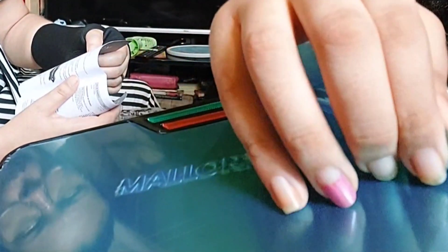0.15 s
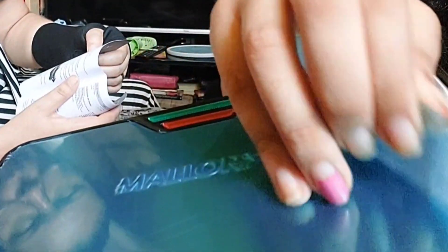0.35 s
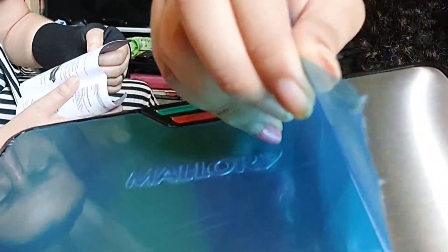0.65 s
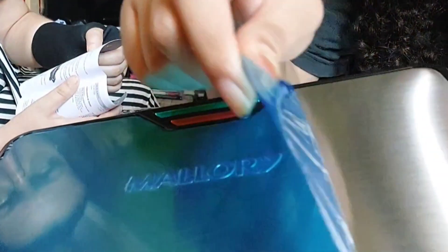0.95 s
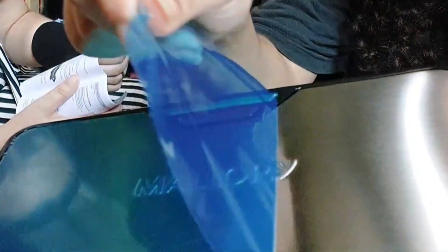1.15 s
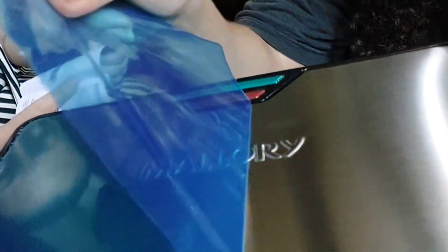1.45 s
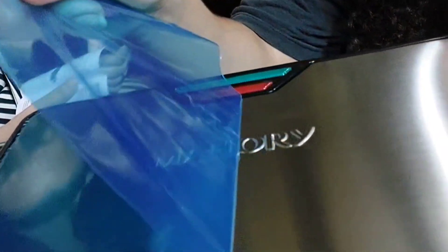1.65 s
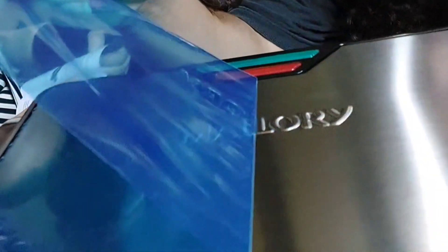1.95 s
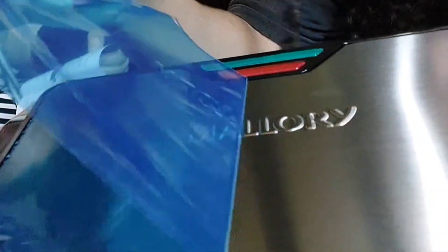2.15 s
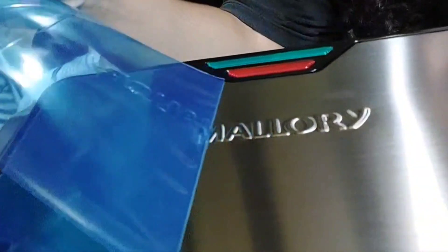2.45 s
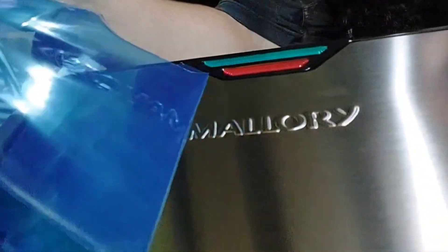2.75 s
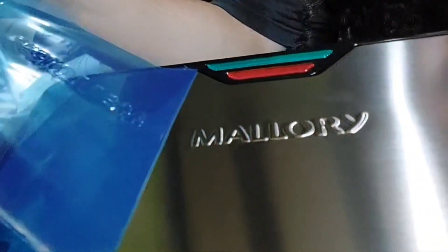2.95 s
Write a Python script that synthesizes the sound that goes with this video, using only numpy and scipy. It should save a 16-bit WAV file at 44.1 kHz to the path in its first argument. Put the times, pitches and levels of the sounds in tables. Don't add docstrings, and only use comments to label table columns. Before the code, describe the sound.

Protective film is peeled off a sheet-metal lid very close to a stereo microphone: single sticky snaps, two quick yanks, a pause, a long falling rip, slower pulls and crackles, in a small quiet room.

```python
import sys
import numpy as np
from scipy import signal
from scipy.fft import rfft, irfft, next_fast_len
from scipy.io import wavfile
from scipy.ndimage import map_coordinates

SR = 44100
rng = np.random.default_rng(int(sys.argv[2]) if len(sys.argv) > 2 else 0)


def boost_factor(decibels):
    exponent = np.asarray(decibels, float) / 20
    return 10 ** exponent


def transcribe(u):
    v = np.clip(np.atleast_2d(u).T, -1, 1)
    q = np.round(v * 32767).astype(np.int16)
    wavfile.write(sys.argv[1], SR, q)


N = 136710

# time in seconds, pull strength in dB, slip rate in Hz,
# push on the lid in dB.
FAST_PULLS = [
    [(.232, -31, 401.7, -23), (.25, -28.5, 500.3, -43), (.285, -46.5, 200.3, -17)],
    [(.339, -26.5, 396.6, -5), (.352, -23.5, 698.3, -13), (.43, -29, 1039, -4.5), (.465, -29, 568.7, -3.5),
     (.49, -34, 470.7, 6), (.512, -53.5, 421.5, 0)],
    [(.926, -30.5, 1543, -9.5), (1.0, -29.5, 1461, -4.5), (1.08, -29, 1073, -1.5), (1.16, -30, 669.1, -3),
     (1.31, -31, 432.9, -3.5), (1.37, -30, 291, -5), (1.403, -43, 212, 4)],
    [(1.512, -32.5, 289.8, -5.5), (1.58, -30, 331.8, -9), (1.7, -31.5, 499.3, -6.5),
     (1.77, -32.5, 302.5, -7), (1.852, -39, 158.5, 2)],
    [(2.069, -35.5, 402.5, -3.5), (2.12, -31, 652.4, -9.5), (2.3, -32, 486.2, -6.5),
     (2.4, -33.5, 347.5, -6.5), (2.463, -36.5, 250.7, -3.5)],
    [(2.699, -32, 280.7, -5), (2.76, -32.5, 398.3, -7.5), (2.8, -31, 642.4, -4.5), (2.91, -34.5, 644, -1),
     (2.95, -34.5, 545.7, -3), (3.01, -40.5, 420, 4)],
]
# time in seconds, strength in dB.
LONE_SLIPS = [(0.0927, -13.0), (0.1062, -10.0), (0.1193, -9.0), (0.1311, -11.0), (0.1441, -6.0),
              (0.1567, -7.0), (0.1675, -6.0), (0.1804, -12.0), (0.1921, -5.0), (0.2086, -8.0),
              (0.2207, -8.0), (0.2289, -9.0), (0.2341, 0.0), (0.2379, -3.0), (0.2421, -8.0),
              (0.2486, -7.0), (0.2546, -2.0), (0.2649, -4.0), (0.2785, -6.0), (0.323, -5.0),
              (0.3295, -7.0), (0.336, -5.0), (0.3443, -2.0),
              (1.3953, -13.0), (1.4075, -15.0), (1.4277, -12.0), (1.4345, -18.0), (1.4421, -14.0),
               (1.4476, -18.0), (1.4563, -11.0), (1.4665, -16.0), (1.476, -13.0), (1.4834, -12.0),
               (1.4907, -14.0), (1.4949, -15.0), (1.5007, -13.0), (1.5043, -13.0), (1.5084, -12.0),
               (2.0504, -18.0), (2.054, -20.0),
              (2.5042, -14.0), (2.5163, -35.0), (2.5214, -13.0), (2.5323, -28.0), (2.5462, -13.0),
               (2.5615, -12.0), (2.5639, -13.0), (2.5737, -13.0), (2.5893, -15.0), (2.5922, -13.0),
               (2.5947, -15.0), (2.6015, -16.0), (2.6155, -9.0), (2.6238, -11.0), (2.6288, -15.0),
               (2.65, -13.0), (2.653, -18.0), (2.6678, -11.0), (2.6731, -15.0), (2.6824, -25.0),
               (2.6879, -8.0), (2.6939, -12.0), (2.6966, -11.0),
              (.1715, -10), (.1965, -15), (.2068, -11), (.2188, -14), (.3505, -2), (2.5195, -16),
               (2.525, -19), (2.6215, -15), (2.6483, -17), (2.6655, -18)]
# time in seconds, strength in dB.
SETTLING_TICKS = [(0.0415, -39), (0.538, -31.5), (.569, -53), (0.589, -42.5), (0.728, -52), (0.7647, -43.5)]
# time in seconds, strength in dB.
STUBBORN_SPOTS = [(0.3606, -3.0), (0.3711, -1.0), (0.3938, -6.0), (0.4018, -6.0), (0.4187, -6.0),
                  (0.4233, -5.0), (0.4364, -7.0), (0.4456, -5.0), (0.4611, -10.0), (1.797, -11.0),
                  (1.8015, -14.0), (1.806, -15.0), (1.8144, -6.0), (1.8214, -10.0), (1.8318, -16.0),
                  (1.8404, -12.0), (1.8465, -13.0), (2.3359, -11.0), (2.3498, -12.0), (2.3719, -9.0),
                  (2.3764, -6.0), (2.3855, -11.0), (2.3888, -11.0), (2.3932, -8.0), (2.3964, -9.0),
                  (2.4088, -9.0), (2.4158, -11.0), (2.4263, -8.0), (2.43, -9.0), (2.4339, -11.0),
                  (2.4381, -9.0), (2.4454, -8.0), (2.4536, -11.0)]
# time in seconds, level in dB.
SLACK_TUG = [(.3, -1), (1.45, 4), (2.05, -1.5), (2.5, 4.5)]

# frequency in Hz, level in dB per Hz.
CORNER_COLOUR = [(530, -37.5), (900, -15), (1640, -11.5), (2960, -5.5), (6030, -8.5), (8870, -18.5),
                 (14000, -13), (16000, -24)]
FREE_CORNER_COLOUR = [(530, -15.5), (900, -6.5), (1300, -3.5), (2300, -1.5), (4000, -7), (7000, -10.5),
                      (8870, -18.5), (16000, -12)]
PULL_START_COLOUR = [(530, -26), (900, -13.5), (1500, -6), (2300, -11.5), (3200, -6), (5400, -5.5),
                     (7200, -13), (8660, -16.5), (16000, -17.5)]
MIDDLE_COLOUR = [(530, -37), (900, -2), (1570, -4), (2300, -7), (3300, 0.5), (6720, -3.5), (8660, -15.5),
                 (12000, -8.5), (16000, -19.5)]
LATE_COLOUR = [(530, -20), (900, -10.5), (1570, -6), (2300, -14), (4000, -7.5), (7000, -5), (8660, -18.5),
               (16000, -17)]
FAR_COLOUR = [(530, -32.5), (900, -9.5), (1080, -6.5), (1170, -9), (2830, -1.5), (5410, -9), (6800, -4.5),
              (16000, -21.5)]
END_COLOUR = [(530, -37.5), (900, -15), (1050, -12.5), (1770, -7.5), (3910, -2), (7230, -8), (8550, -14.5),
              (16000, -14)]
COLOUR_TIMES = [.36, .47, 1.0, 1.35, 1.7, 2.4, 2.8]
# time in seconds, left lag in samples, left minus right in dB.
PEEL_PATH = [(0.203, -13, 0), (1.0, -6, -3), (1.702, -4, 1.5), (2.998, -1, 2.5)]
# frequency in Hz, level in dB.
TUG_COLOUR = [(120, -27), (250, -5), (500, -1.5), (1100, -6), (1700, -4), (3000, -19), (8000, -54.5)]
# start in seconds, low ring in Hz, its level in dB,
# high ring in Hz, its level in dB.
FILM_RINGS = [(0, 2660, -3, 6500, -3), (.6, 1400, 0, 6400, 5.5), (2.2, 2500, -0.5, 6900, -27)]
# frequency in Hz, width in Hz, level in dB.
LID_RINGS = [(549, 61, -6), (639, 20, 4.5), (1073, 36, 2), (1651, 26, -39.5), (2400, 110, -22),
             (2886, 90, 1.5), (4070, 88, 3), (5190, 1000, -0.5), (7110, 660, 6.5)]

# frequency in Hz, time to fall by 60 dB in seconds.
ROOM_DECAY = [(300, .13), (2000, .13), (6000, .11), (12000, .1)]
# frequency in Hz, level in dB.
WALL_COLOUR = [(300, 1.5), (2500, 0), (7000, -3), (14000, -12)]
# frequency in Hz, level in dB per Hz.
AIR_COLOUR = [(71, -35.5), (120, -2), (217, -7), (402, -15), (569, -14.5), (2380, -30), (9020, -40),
              (14200, -34), (16000, -36)]
RUMBLE_COLOUR = [(13, -52.5), (30, -26.5), (50, 4.5), (70, 9.5), (110, 4), (160, -32.5), (210, -36.5),
                 (350, -120)]
# time in seconds, level in dB.
AIR_GAIN_CURVE = [(.03, 4), (.6, -3.5), (.9, -5), (2.0, -1), (3.1, 3)]
# time in seconds, level in dB.
HAND_CURVE = [(0.0, -54.5), (.22, -48), (.33, -57.5), (.36, -42), (.385, -52), (0.42, -45), (0.53, -64),
              (0.59, -59), (1.34, -50.5), (1.6, -52), (1.8, -52.5), (2.34, -55.5), (2.42, -46.5),
              (2.57, -52.5), (2.96, -46), (3.1, -61)]
# frequency in Hz, left minus right in dB.
PORT_DIFFERENCE = [(600, .5), (3000, -2), (9000, 2)]

SNAP_DB, TEAR_DB, STUBBORN_DB = 0.5, 2, -1.5
PUSH_DB, SNAP_PUSH_DB = -7, -15.5
SLIP_SPREAD_DB, CRACK_SPREAD_DB, PUSH_SPREAD_DB = 2, 3, 1.5
JITTER, WANDER = .13, .11
BURST_S, SNAP_S, SNAP_SHIFT_S = .0014, .0009, -.0005
LAG_SPREAD, PAN_SPREAD_DB = 1.0, 2.5
LOW_RING_WIDTH_HZ, HIGH_RING_WIDTH_HZ = 800, 1500
LID_CRACK_DB, LID_TUG_DB = -10.5, 3.5
ROOM_DB, AIR_DB = -5, -61.5
EARLY_T60_S, EARLY_DB = .035, 6
TOP_HZ = 15950


def unit(x):
    return x / np.sqrt(np.mean(x ** 2) + 1e-20)


def along(points, hz):
    f, v = np.transpose(points)
    return np.interp(np.log(hz + 1), np.log(f + 1), v)


def over_time(points, t):
    return np.interp(t, *np.transpose(points))


def wobble(rate):
    return map_coordinates(rng.standard_normal(400), [np.arange(N) * rate / SR % 399])


def filtered(x, response):
    m = 2 * next_fast_len(N // 2 + 8192)
    return irfft(rfft(x, m) * response(np.fft.rfftfreq(m, 1 / SR)), m)[..., :N]


def causal(points, hz):
    c = irfft(np.log(boost_factor(along(points, hz)) + 1e-4))
    half = len(c) // 2
    c[1:half] *= 2
    c[half + 1:] = 0
    h = np.exp(rfft(c))
    return unit(np.abs(h)) * np.exp(1j * np.angle(h))


def resonance(f, centre, width, db):
    return boost_factor(db) * 1j * f * width / (centre * centre - f * f + 1j * f * width)


def impulses(s, size):
    at = np.clip(s * SR, 8, N - 10)
    k = np.floor(at)[:, None] + np.arange(-7, 9)
    d = k - at[:, None]
    click = size[:, None] * np.sinc(d) * np.cos(np.pi * d / 16) ** 2
    return np.bincount(k.astype(int).ravel(), click.ravel(), N)


def pulling(t):
    return sum((t >= p[0][0]) & (t <= p[-1][0]) for p in FAST_PULLS)


def slips():
    t, rows = np.arange(N) / SR, np.concatenate(FAST_PULLS)
    rate_hz = np.exp(np.interp(t, rows[:, 0], np.log(rows[:, 2])) + WANDER * wobble(90))
    at = np.flatnonzero(np.diff(np.floor(np.cumsum(pulling(t) * rate_hz / SR))))
    z = rng.standard_normal((3000, 3))[:len(at)].T
    fast_s = t[at] + JITTER * z[0] / rate_hz[at]
    pull_db = np.interp(fast_s, rows[:, 0], rows[:, 1]) + TEAR_DB
    mean = boost_factor(pull_db) * np.sqrt(SR / rate_hz[at])
    fast_size = mean * boost_factor(SLIP_SPREAD_DB * z[1])
    push_db = np.interp(fast_s, rows[:, 0], rows[:, 3]) + PUSH_DB
    fast_push = mean * boost_factor(push_db + PUSH_SPREAD_DB * z[2])

    stubborn = np.array(STUBBORN_SPOTS) + [0, STUBBORN_DB]
    lone_s, lone_db = np.concatenate([LONE_SLIPS,
                                      SETTLING_TICKS, stubborn]).T
    lone_size = boost_factor(lone_db + SNAP_DB)
    lone_push = lone_size * boost_factor(SNAP_PUSH_DB + over_time(SLACK_TUG, lone_s))

    s = np.r_[lone_s + SNAP_SHIFT_S, fast_s]
    burst_s = np.r_[0 * lone_s + SNAP_S, 0 * fast_s + BURST_S]
    return s, np.r_[lone_size, fast_size], np.r_[lone_push, fast_push], burst_s


def placed(s, size, z):
    t, lag, pan_db = np.transpose(PEEL_PATH)
    late = (np.interp(s, t, lag) + LAG_SPREAD * z[0]) / SR / 2
    side_db = (np.interp(s, t, pan_db) + PAN_SPREAD_DB * z[1]) / 2
    left = impulses(s + late, size * boost_factor(side_db))
    right = impulses(s - late, size * boost_factor(-side_db))
    return np.array([left, right])


def cracks(s, size, burst_s, count=16):
    wait = rng.exponential(size=(3200, count))[:len(s)]
    after = burst_s[:, None] * wait * (np.arange(count) > 0)
    z = rng.standard_normal((3200, 4, count))[:len(s)].transpose(1, 0, 2)
    fade = np.exp(-after / burst_s[:, None] / 2)
    each = np.sign(z[2]) * boost_factor(CRACK_SPREAD_DB * z[3]) * fade
    each = each * (size / np.linalg.norm(each, axis=1))[:, None]
    train = placed((s[:, None] + after).ravel(), each.ravel(), z[:2].reshape(2, -1))

    colours = (CORNER_COLOUR, FREE_CORNER_COLOUR, PULL_START_COLOUR, MIDDLE_COLOUR,
               LATE_COLOUR, FAR_COLOUR, END_COLOUR)
    out = np.zeros((2, N))
    for colour, row in zip(colours, np.eye(len(COLOUR_TIMES))):
        share = np.interp(np.arange(N) / SR, COLOUR_TIMES, row)
        out += filtered(train * share, lambda hz: causal(colour, hz))
    return out


def film_tug(s, push):
    return filtered(placed(s, push, np.zeros(2)), lambda hz: causal(TUG_COLOUR, hz))


def film_twang(crackle):
    t = np.arange(N) / SR
    creeping = 1 - pulling(t)
    stretch = np.searchsorted([row[0] for row in FILM_RINGS[1:]], t)
    out = np.zeros((2, N))
    for k, (_, low, low_db, high, high_db) in enumerate(FILM_RINGS):
        out += filtered(crackle * creeping * (stretch == k),
                        lambda f: resonance(f, low, LOW_RING_WIDTH_HZ, low_db)
                        + resonance(f, high, HIGH_RING_WIDTH_HZ, high_db))
    return out


def lid(train):
    return filtered(train, lambda f: sum(resonance(f, *ring) for ring in LID_RINGS))


def room(x, count=10):
    out, n = np.zeros((2, N + SR)), N // count + 1
    for k in range(count):
        hz, t, z = signal.stft(rng.standard_normal((2, SR // 4)), SR, nperseg=256)
        late = boost_factor(-60 * t / along(ROOM_DECAY, hz)[:, None])
        early = boost_factor(EARLY_DB - 60 * t / EARLY_T60_S)
        tail = signal.istft(z * (late + early), SR, nperseg=256)[1]
        wet = signal.fftconvolve(x[:, k * n:(k + 1) * n], tail / np.linalg.norm(tail[0]), axes=1)
        start = k * n + 90
        out[:, start:start + wet.shape[1]] += wet
    return out[:, :N]


def hiss(spectrum, alike):
    a, b = filtered(rng.standard_normal((2, N)), lambda hz: boost_factor(along(spectrum, hz)))
    u = np.arccos(np.clip(alike, 0, 1)) / 2
    return unit(np.array([np.cos(u) * a + np.sin(u) * b, np.cos(u) * a - np.sin(u) * b]))


def background():
    t = np.arange(N) / SR
    hand_db = over_time(HAND_CURVE, t) + 1.2 * wobble(12)
    air_db = AIR_DB + over_time(AIR_GAIN_CURVE, t) + 0.62 * wobble(3.6)
    air = boost_factor(air_db) * hiss(AIR_COLOUR, alike=0.29)
    rumble = boost_factor(hand_db) * hiss(RUMBLE_COLOUR, alike=.8) * boost_factor([[-1.6], [1.6]])
    return air + rumble


def scene():
    s, size, push, burst_s = slips()
    crackle = cracks(s, size, burst_s)
    tug = film_tug(s, push)
    ringing = lid(boost_factor(LID_CRACK_DB) * crackle + boost_factor(LID_TUG_DB) * tug)
    peel = crackle + film_twang(crackle) + tug + ringing
    echo = room(filtered(peel, lambda hz: boost_factor(along(WALL_COLOUR, hz))))
    return peel + boost_factor(ROOM_DB) * echo + background()


def low_pass(x):
    return signal.sosfilt(signal.butter(12, 16990, fs=SR, output="sos"), x)


def record(dry):
    def ports(hz):
        left_right_db = along(PORT_DIFFERENCE, hz) * np.array([[.5], [-.5]])
        return boost_factor(left_right_db) / (1 + (hz / TOP_HZ) ** 60)
    return low_pass(filtered(dry, ports))


dry = scene()
out = record(dry)
transcribe(out)
```